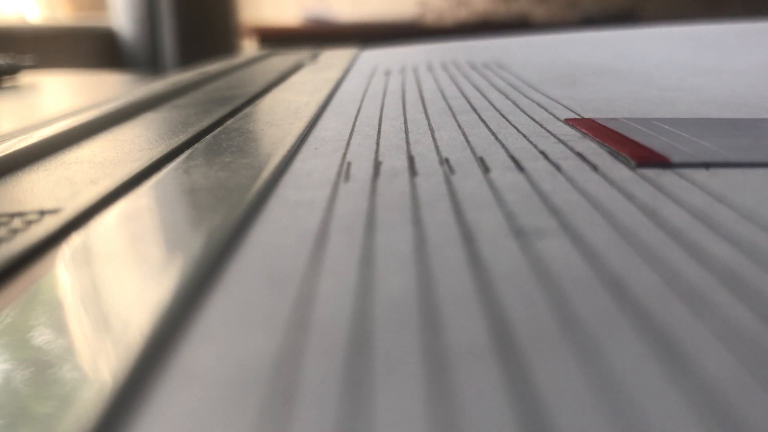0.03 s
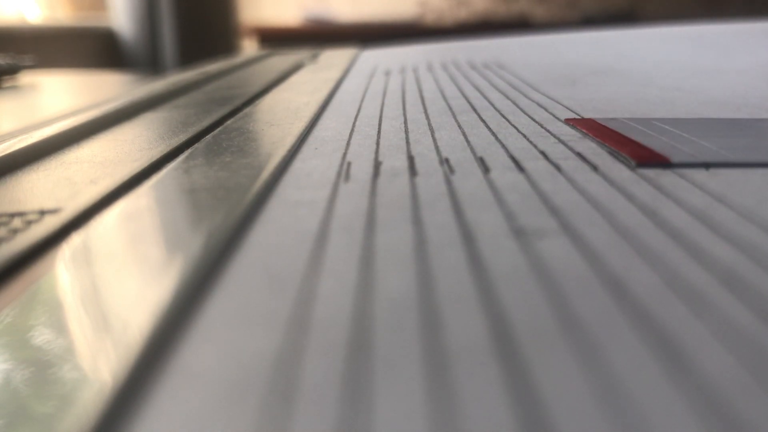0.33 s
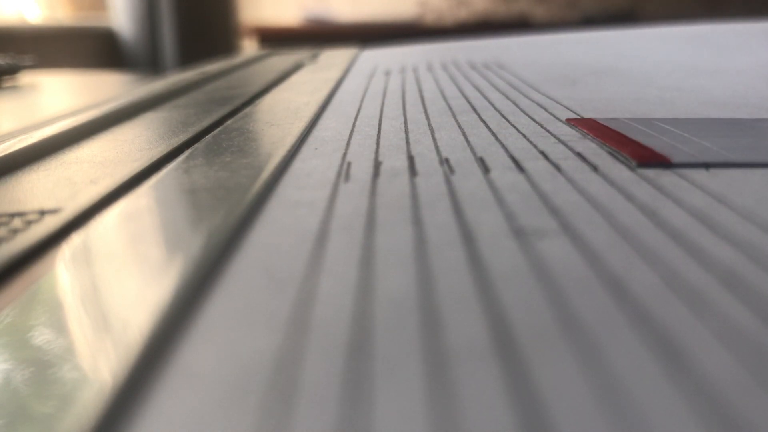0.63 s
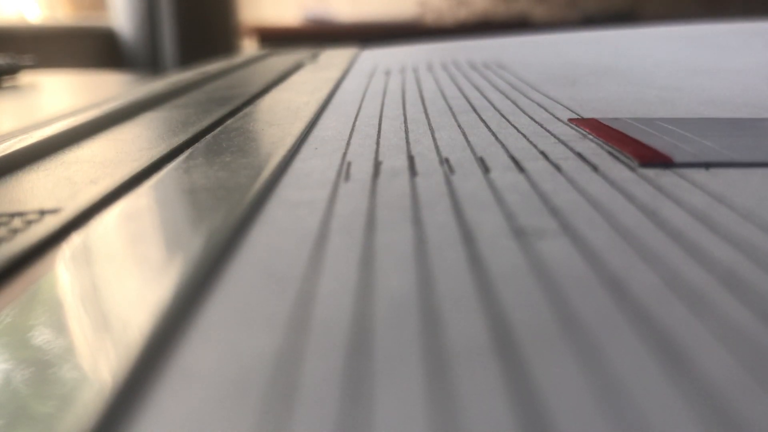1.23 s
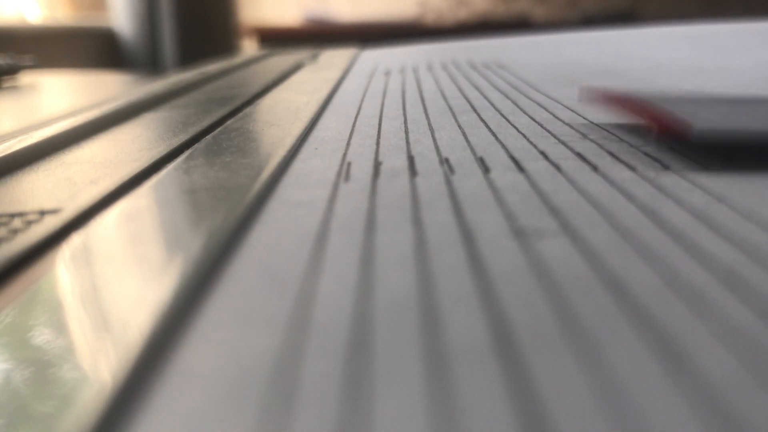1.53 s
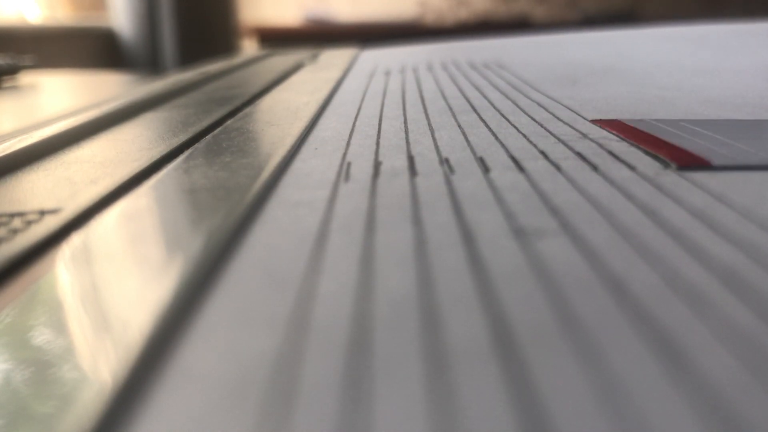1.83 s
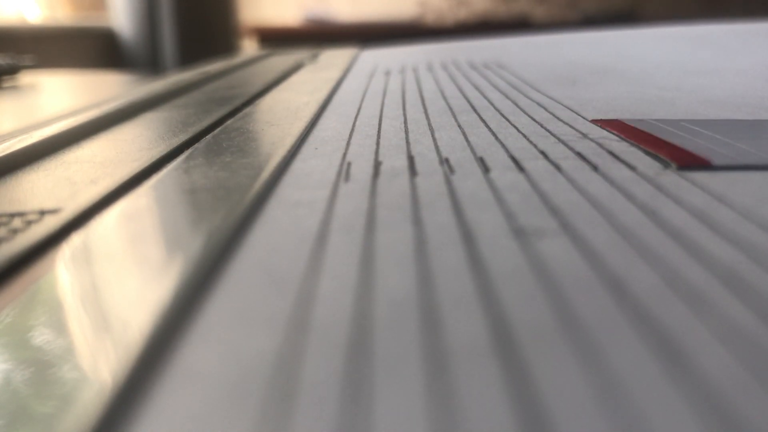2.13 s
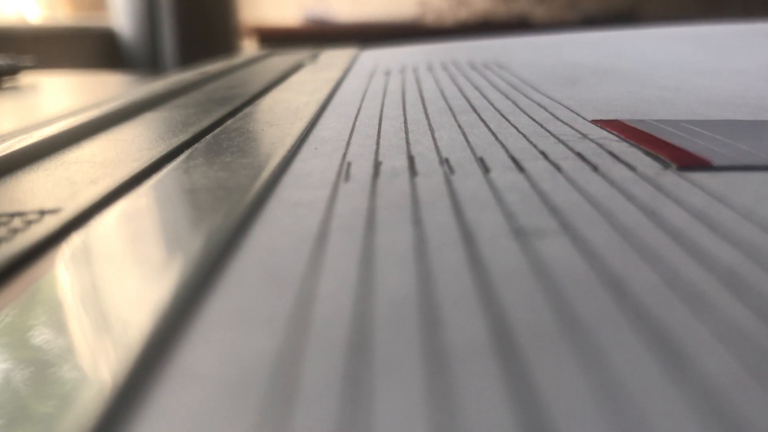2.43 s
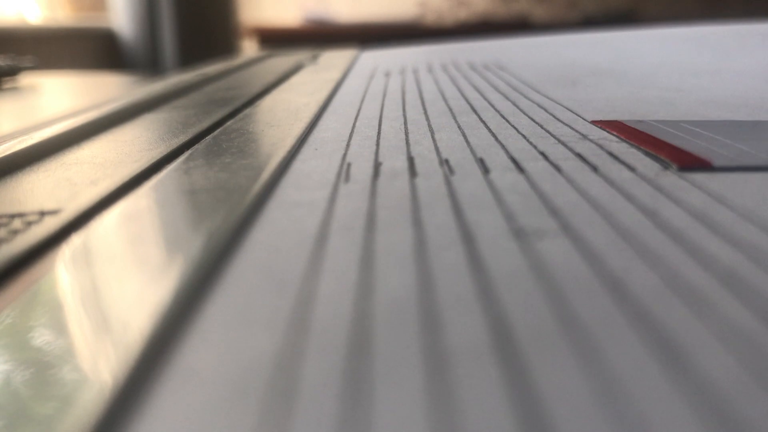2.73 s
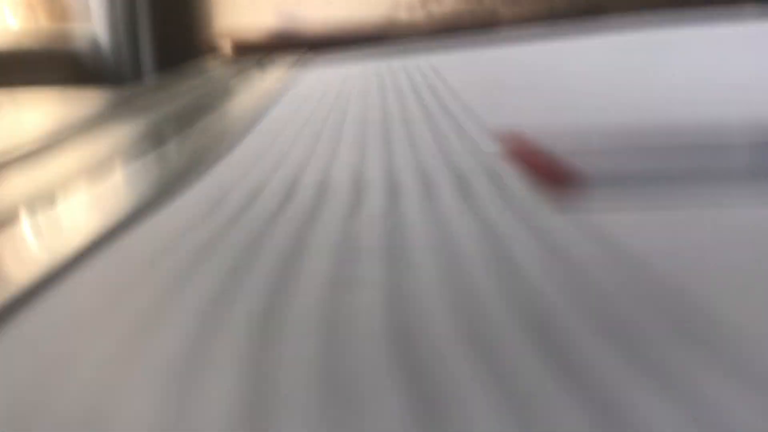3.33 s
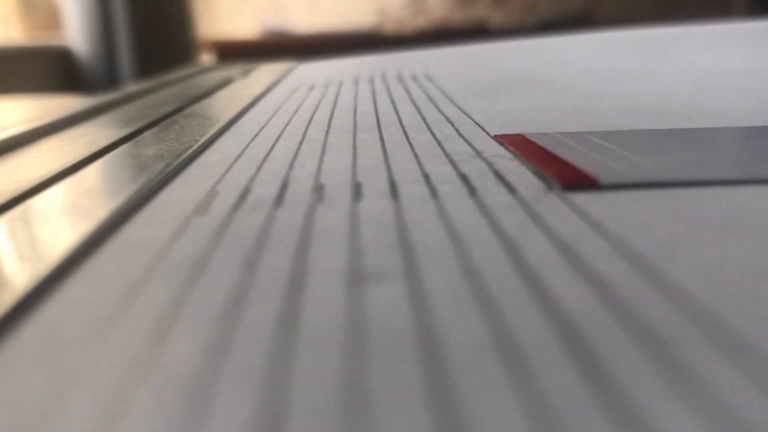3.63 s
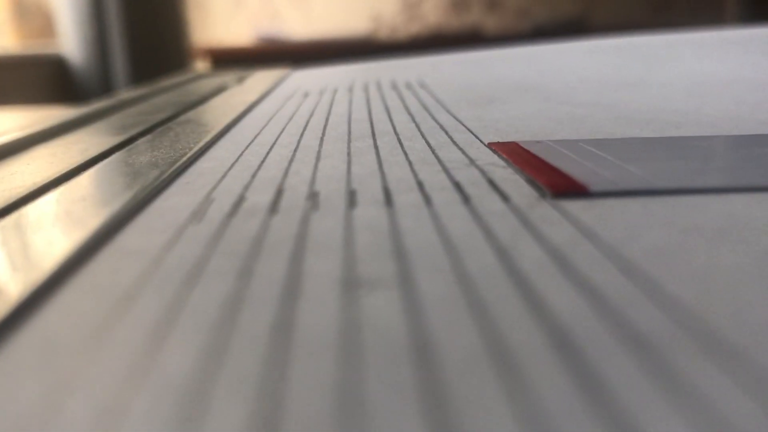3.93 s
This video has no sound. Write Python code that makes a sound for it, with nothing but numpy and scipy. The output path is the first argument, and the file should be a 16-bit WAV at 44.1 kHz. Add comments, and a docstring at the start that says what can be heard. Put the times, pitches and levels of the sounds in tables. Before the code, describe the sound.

A camera is handled on a work top in a quiet room with faint hum and ticking. Soft, dull bumps come first, then a short gritty scrape across paper with sharp knocks and clicks, right at the microphone.

```python
"""Handling noise on a work top

A quiet room, the microphone close over a sheet on a work top. Steady air noise, a thin machine whine
and faint, even electrical ticks run throughout. Hands bump the top softly and brush the sheet; near the
end the camera scrapes a short way over it, knocks, clicks and settles."""
import sys
import numpy as np
from scipy import signal
from scipy.fft import rfft, irfft, next_fast_len
from scipy.io import wavfile

SR = 44100
rng = np.random.default_rng(int(sys.argv[2]) if len(sys.argv) > 2 else 0)


def wav_out(sig):
    """Save sig, one row per channel (or a flat mono array), as 16-bit PCM at SR to the path in sys.argv[1]."""
    wavfile.write(sys.argv[1], SR, np.round(np.clip(np.atleast_2d(sig).T, -1, 1) * 32767).astype(np.int16))


N = 176400


def amp(db):
    return 10 ** (np.asarray(db) / 20)


def unit(x):
    return x / np.sqrt(np.mean(x ** 2) + 1e-20)


def clock():
    return np.arange(N) / SR


def add(track, start_s, sound):
    """Lay a sound into a track."""
    i = max(0, round(start_s * SR))
    track[i:i + len(sound)] += sound[:max(0, N - i)]


def filtered(x, response):
    """Pass x through a complex frequency response."""
    size = next_fast_len(N + SR // 2)
    return irfft(rfft(x, size) * response(np.fft.rfftfreq(size, 1 / SR)), size)[:N]


def coloured(x, tone):
    """Causal filter of unit power through (freq_hz, level_db) points."""
    def response(hz):
        freq_hz, level_db = np.transpose(tone)
        gain = unit(amp(np.interp(np.log(hz + 1), np.log(freq_hz + 1), level_db)))
        cepstrum = irfft(np.log(gain))
        cepstrum[1:len(cepstrum) // 2] *= 2  # fold to minimum phase
        cepstrum[len(cepstrum) // 2 + 1:] = 0
        return np.exp(rfft(cepstrum))
    return filtered(x, response)


def snaps(events, tone, t60_s):
    """A brief dying noise burst for each (start_s, level_db), coloured by tone."""
    out, t = np.zeros(N), clock()[:SR // 10]
    fade = 1000 ** (-t / t60_s)
    for start_s, level_db in events:
        phase = np.angle(rfft(fade * rng.standard_normal(len(t))))
        burst = np.sqrt(fade) * irfft(np.exp(1j * phase), len(t))  # even spectrum
        add(out, start_s, amp(level_db) * .5 * burst * np.linalg.norm(fade) / np.linalg.norm(burst))
    return coloured(out, tone)


def friction(strokes, tone, attack_s, release_s, hiss, slips_per_s=4000):
    """Tiny slips and their hiss under strokes that rise, hold and die away."""
    t, force = clock(), np.zeros(N)
    for start_s, length_s, level_db in strokes:
        rise = np.clip((t - start_s) / attack_s, 0, 1)
        fall = np.exp(-np.maximum(t - start_s - length_s, 0) / release_s)
        force += amp(level_db) * rise * fall
    slips = (rng.random(N) < slips_per_s / SR) * rng.standard_normal(N)
    return force * unit(coloured(unit(slips) + hiss * rng.standard_normal(N), tone))


def blow(thud_db, thud_hz, ring_db, modes, rise_cycles):
    """An impact: a short thud plus ringing (pitch_hz, level_db, t60_s) modes."""
    t = clock()[:SR]
    rise = t * thud_hz / rise_cycles
    thud = rise * np.exp(1 - rise) * np.sin(2 * np.pi * thud_hz * t)
    ring = sum(amp(db) * 1000 ** (-t / t60_s) * (1 - np.exp(-t * hz)) * np.sin(2 * np.pi * hz * t)
               for hz, db, t60_s in modes)
    return amp(thud_db) * thud + amp(ring_db) * ring


def bending_waves(x, lag_at_1khz_s=0.00107):
    """Bending waves spread through the stiff top: the bass arrives last."""
    return filtered(x, lambda hz: np.exp(-4j * np.pi * lag_at_1khz_s * np.sqrt(1000 * hz)))


def room_tone(air_db=-55.5, whine_hz=845.7):
    """The bed of the room: low, steady air noise and a thin machine whine."""
    air_tone = [(12, -41.5), (20, 2), (68, 5.5), (154, -15), (228, -14), (399, -22.5), (558, -25.5),
                (780, -24.5), (849, -25.5), (923, -22), (1220, -23), (1330, -25.5), (1760, -23),
                (2140, -32), (3070, -31.5), (3340, -35.5), (5530, -38.5), (6540, -35), (7950, -44.5),
                (9400, -38), (11100, -45.5), (13200, -37.5), (16000, -49)]  # spectrum of the air: freq_hz, level_db
    whine_levels = [(0, -79), (1.0, -79), (1.5, -72), (2.2, -72.5), (3.0, -72), (4, -76)]  # swell of the whine: time_s, level_db
    t = clock()
    whine_rms = amp(np.interp(t, *np.transpose(whine_levels)))
    whine = whine_rms * np.sqrt(2) * np.sin(2 * np.pi * whine_hz * t)
    return amp(air_db) * unit(coloured(rng.standard_normal(N), air_tone)) + whine


def electrical_ticks(first_s=.0757, period_s=.10238, crackles_per_s=4):
    """Even ticks, probably radio bursts leaking into the microphone, with strays and faint crackle."""
    strong_beats = [2, 4, 6, 9, 12, 14, 15, 18, 21, 23, 26, 28, 30, 38]  # the louder ticks: beat_index
    strays = [(.486, -50), (1.123, -43.5), (1.1705, -57), (1.763, -46.5), (2.092, -49.5), (2.404, -45.5),
              (3.021, -39.5), (3.169, -44.5), (3.684, -48)]  # extra ticks: start_s, level_db
    tick_tone = [(500, -26.5), (1200, -26), (1800, 7), (3000, 10), (4500, -8), (5600, -1), (6700, 8.5),
                 (8000, -14.5), (9500, 1.5), (11000, -11), (13000, -3), (16000, -4.5)]  # spectrum of a tick: freq_hz, level_db
    crackle_tone = [(800, -4), (2000, -10), (3000, -3), (4500, -7), (6500, 4), (9000, -10), (16000, -34)]  # spectrum of the crackle: freq_hz, level_db
    strong_db, ordinary_db, crackle_db = -43.5, -48.5, -54.5
    beats = [(start_s, strong_db if beat in strong_beats else ordinary_db)
             for beat, start_s in enumerate(np.arange(first_s, N / SR, period_s))]
    ticks = snaps(beats + strays, tick_tone, t60_s=.005)
    crackles = [(start_s, crackle_db) for start_s in clock()[rng.random(N) < crackles_per_s / SR]]
    return ticks + snaps(crackles, crackle_tone, t60_s=.005)


def hand_bumps(sway_t60_s=0.51):
    """Hands bump the work top under the microphone: a tap, a thud and a deep sway."""
    bumps = [(0.093, -43.5, 64, -46.5, -77, 48.3), (0.622, -35.5, 74.5, -39, -72, 43.5),
             (0.901, -43, 58.7, -58, -65, 53.4), (1.134, -26, 117, -25, -26.5, 43.7),
             (1.154, -22, 58.4, -44, -48, 52), (1.5675, -32.5, 111, -31, -46.5, 51),
             (1.627, -30, 61, -53, -65, 53.5), (1.6517, -57, 261, -31.5, -35.5, 46.1),
             (1.736, -34, 55, -39, -75, 43.6), (2.144, -37, 107, -36.5, -51, 51.7),
             (2.5288, -33, 101, -33, -40, 56.5), (2.737, -40.5, 306, -38.5, -48, 56),
             (3, -41.5, 308, -58, -54, 56.5), (3.01, -34, 97, -46.5, -57, 56.4),
             (3.669, -34.5, 84.2, -75, -68, 47), (3.814, -37, 133.2, -63.5, -66.5, 53.3),
             (3.835, -31.5, 117, -45, -68, 48.3)]  # soft contacts: start_s, thud_db, thud_hz, sway_db, tap_db, sway_hz
    tap_tone = [(200, 2.5), (800, 9), (1300, 8), (1800, 12.5), (2400, -2.5), (3900, -3), (4900, -17.5),
                (5700, -27), (16000, -39)]  # spectrum of a tap: freq_hz, level_db
    thuds, taps = np.zeros(N), []
    for start_s, thud_db, thud_hz, sway_db, tap_db, sway_hz in bumps:
        add(thuds, start_s, blow(thud_db, thud_hz, sway_db, [(sway_hz, 0, sway_t60_s)], rise_cycles=0.45))
        taps.append((start_s, tap_db))
    return bending_waves(thuds) + snaps(taps, tap_tone, t60_s=.018)


def grip_creaks():
    """The grip slips in tiny steps and creaks dully."""
    creaks = [(.34, 0.15, -68), (1.137, 0.064, -47), (1.618, 0.071, -49.5), (2.74, 0.2, -54),
              (3.0, 0.075, -52), (3.145, 0.097, -57.5), (3.6, 0.019, -64), (3.94, .06, -55)]  # slips of the grip: start_s, length_s, level_db
    creak_tone = [(40, -33), (90, 14), (170, 2), (310, 10), (430, -9.5), (650, -26.5), (2000, -40)]  # spectrum of a creak: freq_hz, level_db
    return friction(creaks, creak_tone, attack_s=0.0019, release_s=.012, hiss=.3)


def hand_brushes():
    """A hand brushes lightly past, close to the microphone."""
    strokes = [(1.105, 0.075, -62), (1.136, 0.0046, -47), (1.298, 0.074, -75), (1.655, 0.017, -60),
               (3.0, 0.025, -58.5), (3.02, 0.01, -56.5), (3.06, 0.017, -60), (3.137, 0.018, -54.5),
               (3.247, .012, -45), (3.259, .009, -37), (3.435, 0.1, -46), (3.502, 0.0072, -27),
               (3.512, 0.016, -57), (3.544, 0.0045, -33.5), (3.556, 0.039, -53.5), (3.648, 0.017, -52),
               (3.795, 0.012, -54.5), (3.813, 0.017, -48.5)]  # light touches: start_s, length_s, level_db
    brush_tone = [(100, 5), (400, 13.5), (750, 6.5), (950, 4), (1150, -2), (1300, 1), (1700, 6.5),
                  (2600, -7), (4200, -13.5), (5300, -17), (6700, -20), (9000, -36), (16000, -32)]  # spectrum of a touch: freq_hz, level_db
    return friction(strokes, brush_tone, attack_s=0.0031, release_s=.005, hiss=1.0)


def sheet_rustles():
    """The sheet rustles as it relaxes."""
    rustles = [(1.294, 0.019, -62.5), (1.662, 0.015, -66.5)]  # shifts of the sheet: start_s, length_s, level_db
    rustle_tone = [(500, -25), (1300, -5), (1800, 4.5), (2400, -8), (3000, -3.5), (3350, -3), (3800, -13),
                   (6500, -21), (16000, -33)]  # spectrum of a rustle: freq_hz, level_db
    return friction(rustles, rustle_tone, attack_s=0.0061, release_s=0.049, hiss=0.67)


def camera_knocks():
    """The camera catches, rattles and is set down; each knock cracks, thuds and rings."""
    knocks = [(3.237, -35.5, 380, -44, -59), (3.247, -19, 230, -34, -63), (3.3525, -8, 114.8, -24.5, -0.5),
              (3.3527, -5, 250, -29, -31.5), (3.3579, -5.5, 530, -27.5, -24),
              (3.3608, -10.5, 252, -40.5, -29.5), (3.3715, -9.5, 278, -36, -21),
              (3.4323, -19.5, 480, -29.5, -13.5), (3.434, -18.5, 90, -35, -47),
              (3.462, -24.5, 79.3, -55, -67), (3.5062, -11.5, 474, -34, -38), (3.5077, -7, 251, -54, -58)]  # hard contacts: start_s, thud_db, thud_hz, ring_db, crack_db
    body_modes = [(91.7, -0.5, 0.31), (137.3, 4, 0.14), (218, 0, 0.04), (280, -1, 0.052), (425, 7.5, 0.069),
                  (437, -24, 0.09), (533, -13.5, .55), (623, -1, 0.045)]  # what the knocks ring: pitch_hz, level_db, t60_s
    casing_tone = [(40, -3.5), (120, 4), (180, 2.5), (240, 5), (300, 2), (355, 4), (450, 4), (600, 2.5),
                   (720, 9.5), (1200, 3.5), (2000, -12.5), (16000, 5.5)]  # colour of the casing: freq_hz, level_db
    crack_tone = [(300, -23), (1200, -9), (2000, 5.5), (3000, 3.5), (4000, 1), (5200, -16), (8000, -28),
                  (16000, -43)]  # spectrum of a crack: freq_hz, level_db
    thuds, cracks = np.zeros(N), []
    for start_s, thud_db, thud_hz, ring_db, crack_db in knocks:
        add(thuds, start_s, blow(thud_db, thud_hz, ring_db, body_modes, rise_cycles=0.34))
        cracks.append((start_s, crack_db))
    return coloured(bending_waves(thuds), casing_tone) + snaps(cracks, crack_tone, t60_s=.006)


def camera_scrape():
    """The camera drags over the sheet in short, gritty strokes."""
    strokes = [(3.266, 0.031, -25.5), (3.3, 0.072, -29), (3.394, 0.035, -33.5)]  # slides: start_s, length_s, level_db
    scrape_tone = [(60, -33.5), (120, -11.5), (180, -11), (315, -6), (513, -1.5), (595, -6.5), (660, 1),
                   (768, -5.5), (970, -0.5), (1280, -11.5), (1520, -2.5), (1900, -4), (2300, -5),
                   (2650, -12), (3300, -14.5), (4000, -21.5), (4500, -11), (5080, -20), (6560, -15),
                   (7940, -30), (9820, -30), (11200, -41), (12800, -37.5), (16000, -50)]  # spectrum of the scrape: freq_hz, level_db
    return friction(strokes, scrape_tone, attack_s=0.0037, release_s=0.008, hiss=0.86)


def casing_clicks():
    """The casing clicks sharply among the hardest knocks."""
    clicks = [(3.3613, -9.5), (3.3622, -16.5), (3.3696, -19), (3.3715, -17), (3.3738, -14), (3.3863, -23),
              (3.388, -25), (3.5103, -16)]  # contacts of the casing: start_s, level_db
    click_tone = [(500, -11.5), (2000, 2.5), (4500, -0.5), (6200, 3), (8000, -5), (11000, -9.5),
                  (12700, -11), (16000, -20)]  # spectrum of a click: freq_hz, level_db
    return snaps(clicks, click_tone, t60_s=0.0081)


def room_echo(x, t60_s=0.19, cutoff_hz=2500):
    """The room answers with a short, dull tail."""
    t = clock()[:SR // 2]
    tail = rng.standard_normal(len(t)) * 1000 ** (-t / t60_s)
    echo = signal.fftconvolve(x, tail / np.linalg.norm(tail))[:N]
    return filtered(echo, lambda hz: 1 / (1 + 1j * hz / cutoff_hz))


def scene():
    """Close handling with a faint echo, over the ticks and room tone, in mono."""
    handling = hand_bumps() + camera_knocks() + casing_clicks()
    handling += camera_scrape() + hand_brushes() + sheet_rustles() + grip_creaks()
    return (handling + amp(-20) * room_echo(handling) + electrical_ticks() + room_tone())[None]


def record(dry):
    """The microphone drops the deepest bass and cuts off steeply at the top of its band."""
    low_cut_hz, top_hz = 26, 16050
    sound = signal.sosfilt(signal.butter(2, low_cut_hz, "highpass", fs=SR, output="sos"), dry[0])
    return filtered(sound, lambda hz: 1 / np.sqrt(1 + (hz / top_hz) ** 160))[None]


dry = scene()
out = record(dry)
wav_out(out)
```